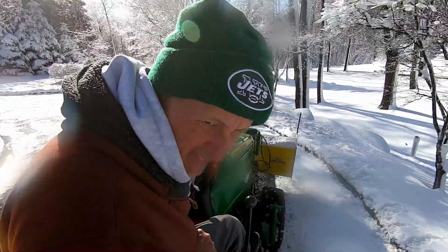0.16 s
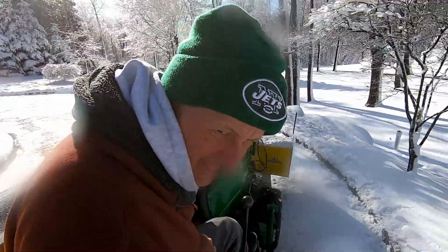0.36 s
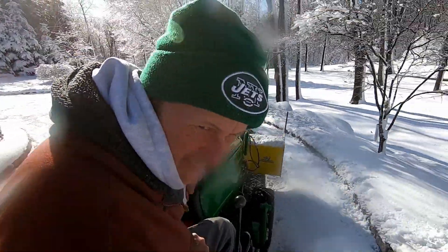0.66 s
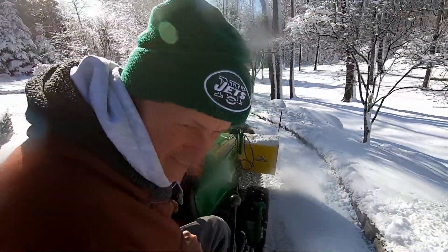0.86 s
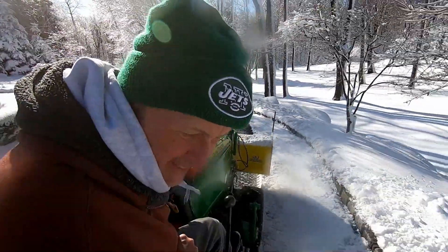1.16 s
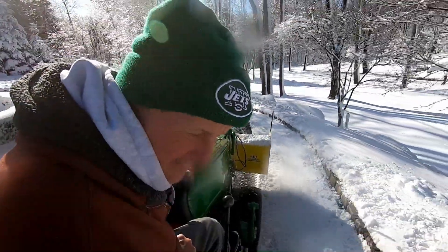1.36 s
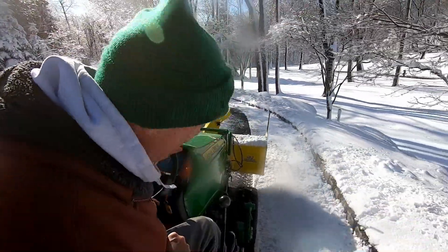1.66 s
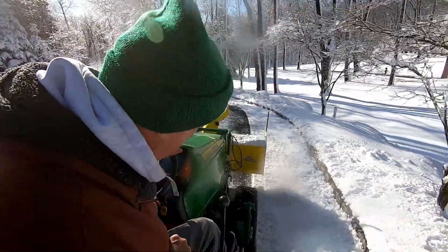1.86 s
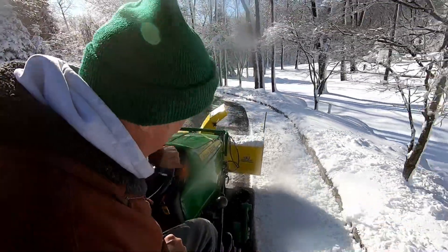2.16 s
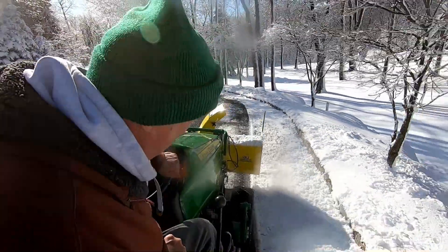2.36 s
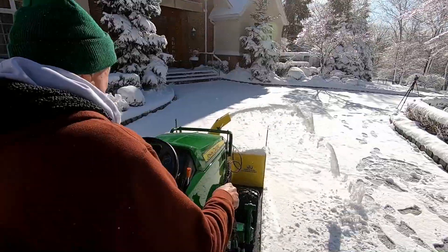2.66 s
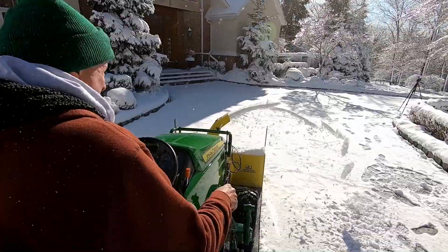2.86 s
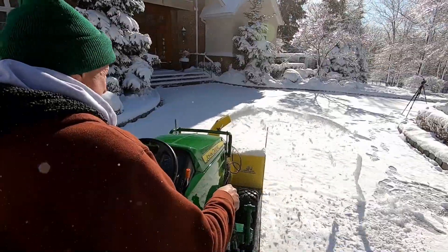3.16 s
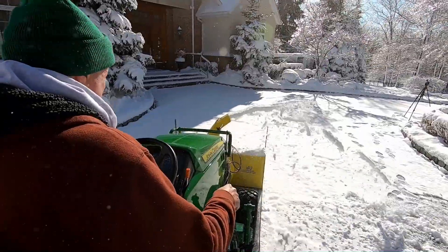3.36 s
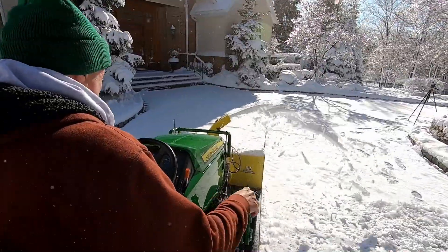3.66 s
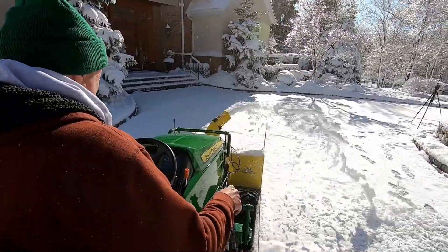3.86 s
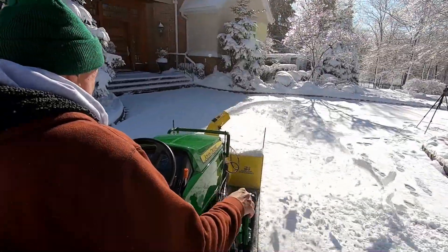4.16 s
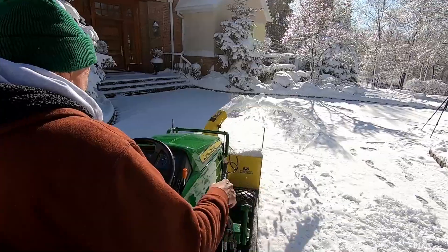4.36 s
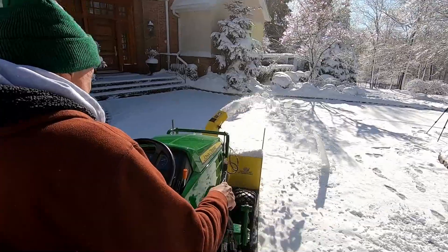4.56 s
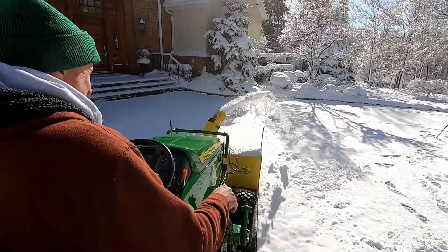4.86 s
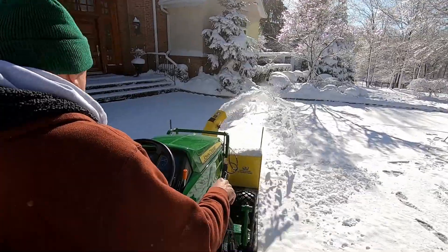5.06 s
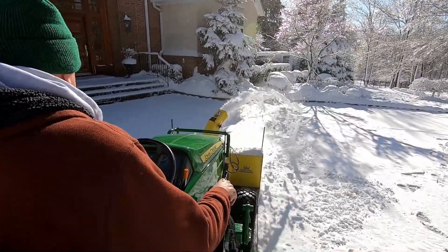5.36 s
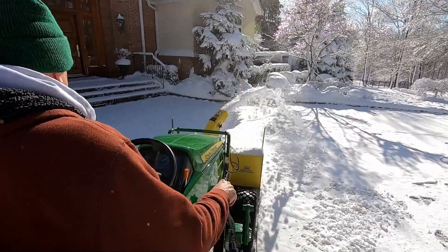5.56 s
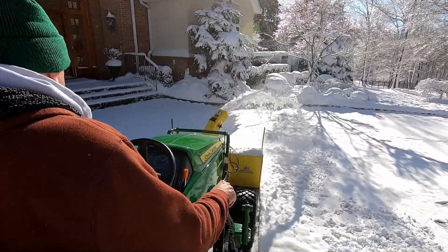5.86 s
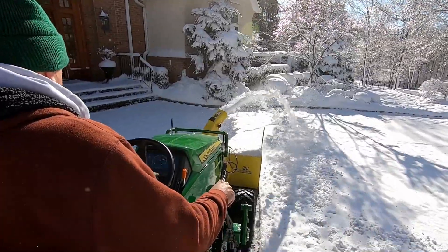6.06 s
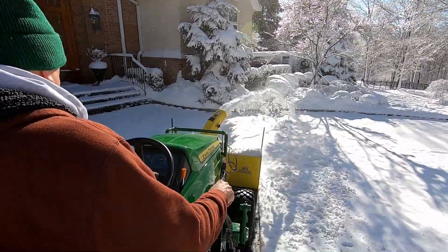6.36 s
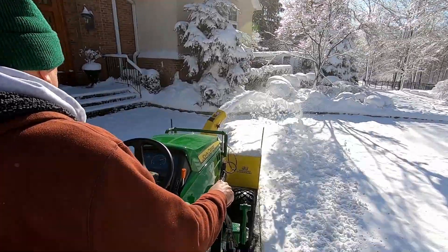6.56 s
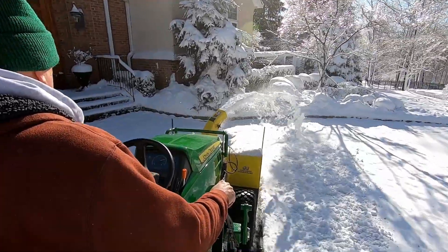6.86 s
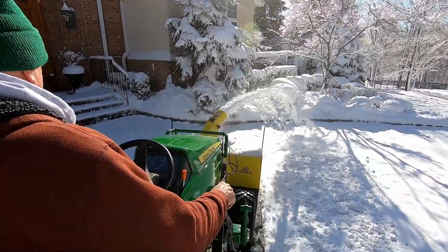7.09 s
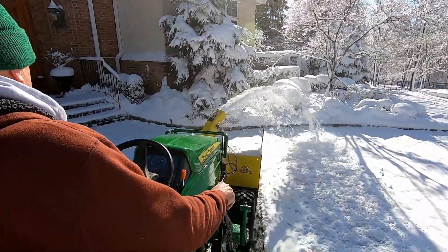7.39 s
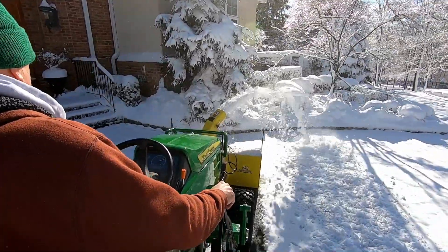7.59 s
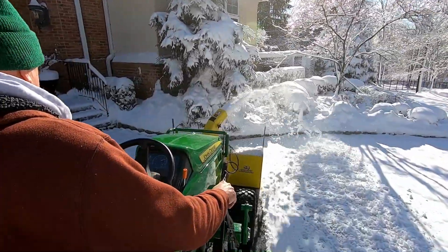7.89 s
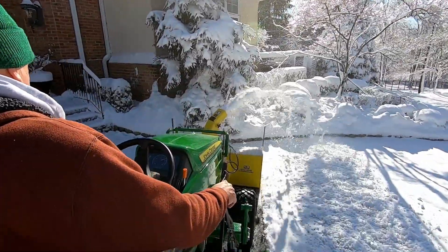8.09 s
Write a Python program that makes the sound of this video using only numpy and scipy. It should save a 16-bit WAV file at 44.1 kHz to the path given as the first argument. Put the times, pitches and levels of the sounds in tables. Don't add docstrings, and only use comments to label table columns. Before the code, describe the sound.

Steady low diesel drone with hydraulic whine and gear ring, breeze buffeting, then a sudden cut to a heavier metallic snow-blowing roar.

```python
import sys
import numpy as np
from scipy import signal
from scipy.fft import rfft, irfft, next_fast_len
from scipy.io import wavfile
from scipy.ndimage import uniform_filter1d, map_coordinates

SR = 44100
rng = np.random.default_rng(int(sys.argv[2]) if len(sys.argv) > 2 else 0)


def natural_amplitude(level_db):
    exponent = np.asarray(level_db, float) / 20
    return 10 ** exponent


def to_wav(s):
    ch = np.atleast_2d(s).T
    pcm = np.round(np.clip(ch, -1, 1) * 32767)
    wavfile.write(sys.argv[1], SR, pcm.astype(np.int16))


N = 362938
TIME = np.arange(N) / SR
CHANGE_S = 2.475

# (time [s], pump pressure [dB], gear load [dB], snow intake [dB])
EFFORT = [(0, 0, -20.5, -2.5), (.5, -9, -3, -1), (.8, -6, 6, 0.5), (1.6, -2.5, 4.5, 0.5), (2.45, 0, -1, 1),
          (2.5, 1, 3, -1.5), (3.7, 2.5, -12.5, 2), (4.5, 1.5, 5, 1), (5.1, 1.5, -2, 0.5), (5.7, 1, 5, 0.5),
          (6.9, 0.5, 4.5, -1.5), (7.2, -14.5, 4, -2), (8.23, -15, 4, -2.5)]
# (time [s], engine sag [cycles/s], moan level [dB])
BITE = [
    (3.3, 0, -34),
    (3.92, .55, -31),
    (4.42, .38, -44),
    (6, 0, -45),
]


def unit(x):
    return x / np.sqrt(np.mean(x ** 2) + 1e-20)


def along(points, hz):
    f, v = np.transpose(points)
    return np.interp(np.log(hz + 1), np.log(f + 1), v)


def curves(rows):
    s, *columns = np.transpose(rows)
    return [np.interp(TIME, s, column) for column in columns]


def wobble(rate):
    knots = rng.standard_normal(int(N * rate / SR) + 4)
    return map_coordinates(knots, [np.arange(N) * rate / SR])


def filtered(x, response):
    m = next_fast_len(N + 8192)
    return irfft(rfft(x, m) * response(np.fft.rfftfreq(m, 1 / SR)), m)[..., :N]


def by_stretch(first, second):
    share = np.clip((TIME - CHANGE_S) / .01 + .5, 0, 1)
    return first + share * (second - first)


def tone(turns, level_db, flutter_db, slip, phase=None):
    size = natural_amplitude(level_db + flutter_db * wobble(12))
    phase = rng.uniform(0, 2 * np.pi) if phase is None else phase
    return np.sqrt(2) * size * np.cos(2 * np.pi * turns + slip * wobble(9) + phase)


def band(x, lo_hz, hi_hz):
    def response(f):
        return 1 / np.sqrt((1 + (lo_hz / (f + 1)) ** 12) * (1 + (f / hi_hz) ** 12))

    y = filtered(x, response)
    edge = int(CHANGE_S * SR)
    return np.concatenate([unit(y[:edge]), unit(y[edge:])])


def speed():
    # (time [s], engine cycles [1/s])
    pace = [(0, 23.24), (1.5, 23.29), (2.1, 23.25), (4.6, 23.26), (5.8, 23.17), (6.3, 23.26), (6.8, 23.2),
            (7.75, 23.48), (8, 23.33), (8.23, 23.4)]
    sag_s, recover_s = .17, .13
    sag = sum(depth * np.interp(TIME, [s - sag_s, s, s + recover_s], [0, 1, 0]) for s, depth, _ in BITE)
    return curves(pace)[0] - sag


def engine(cycles):
    # (first stretch [dB], second stretch [dB])
    exhaust = [(-20, -17), (-36, -26.5)]
    # (first stretch [dB], second stretch [dB])
    upper_firing = [(-38.5, -32), (-38.5, -39), (-29, -38)]
    firing_phase = [2.4, -.9, 1.2, -.6]
    crank_orders = [2, 4, 8, 10, 32, 33, 72]
    # (first stretch [dB], second stretch [dB])
    crank = [(-42, -42.5), (-38.5, -33.5), (-45, -37.5), (-46.5, -52.5), (-46, -47.5), (-44, -43),
             (-40, -58)]
    _, load_db, snow_db = curves(EFFORT)

    firing_db = by_stretch(*exhaust[0]) + .25 * snow_db + .5 * wobble(3)
    levels_db = [by_stretch(*exhaust[1]) + 1.1 * wobble(8)]
    levels_db += [by_stretch(*db) for db in upper_firing]
    levels_db[3] = levels_db[3] + by_stretch(.45, 0) * (load_db - 2)
    boom = tone(3 * cycles, firing_db - .1, flutter_db=.3, slip=.04, phase=0)
    for harmonic, (db, phase) in enumerate(zip(levels_db, firing_phase), start=2):
        boom += tone(3 * harmonic * cycles, db, flutter_db=1.3, slip=.2, phase=phase)

    moan_db = np.max([db - 40 * np.abs(TIME - s) for s, _, db in BITE], axis=0)
    boom += tone(23.7 * cycles, moan_db, flutter_db=2.5, slip=.3)
    for order, db in zip(crank_orders, crank):
        boom += tone(order * cycles, by_stretch(*db), flutter_db=3.0, slip=0.28)
    return boom


def pump(cycles):
    orders = [14, 28, 42, 56]
    # (first stretch [dB], second stretch [dB])
    levels = [(-32, -36.5), (-40, -32), (-37.5, -47.5), (-21.7, -30.5)]
    pressure_db = curves(EFFORT)[0]
    felt = [.5, 1, .5, 0]
    flutter_db, slip = by_stretch(.7, 1.4), by_stretch(.15, .45)
    return sum(tone(order * cycles, by_stretch(*db) + share * pressure_db, flutter_db, slip)
               for order, db, share in zip(orders, levels, felt))


def gears(cycles):
    orders = [15.29, 30.58, 51.3, 53.95]
    # (first stretch [dB], second stretch [dB])
    levels = [(-32.5, -39.5), (-38, -39), (-46, -41.5), (-44, -33.5)]
    shrill_orders = [120, 168, 170.4]
    # (first stretch [dB], second stretch [dB])
    shrill = [(-44, -58.5), (-44.5, -53.5), (-50, -49)]
    load_db = curves(EFFORT)[1]
    felt = [0.95, 0.32, .5, 0.99]
    flutter_db, slip = by_stretch(1.3, 1.7), by_stretch(.3, .5)
    mesh = sum(tone(order * cycles, by_stretch(*db) + share * load_db, flutter_db, slip)
               for order, db, share in zip(orders, levels, felt))
    return mesh + sum(tone(order * cycles, by_stretch(*db), flutter_db=2.5, slip=1.6)
                      for order, db in zip(shrill_orders, shrill))


def wheel_creep():
    # (harmonic [1], level [dB])
    harmonics = [(2, -40), (4, -46), (5, -44), (6, -37)]
    turns = 301.1 * np.cumsum(1 + .002 * wobble(3)) / SR
    return sum(tone(k * turns, db, flutter_db=2.5, slip=.5) for k, db in harmonics)


def wheel_glide(cycles):
    # (time [s], multiple of the engine cycle [1], level [dB])
    travel = [(2.475, 58.55, -37), (3, 58.9, -37), (4.9, 59.1, -37), (6.1, 58.9, -35), (6.5, 58.3, -33),
              (7.15, 56.5, -30), (7.4, 55.8, -50), (8.23, 55.6, -60)]
    ratio, wheel_db = curves(travel)
    turns = np.cumsum(ratio * np.gradient(cycles))
    main = tone(turns, wheel_db, flutter_db=1.5, slip=.4)
    return main + tone(turns * 3 / 8, wheel_db - 8, flutter_db=2.5, slip=.3)


def smear(lines):
    def response(f):
        return np.sqrt(sum(natural_amplitude(2 * db) * SR / (np.pi * width) / (1 + (2 * (f - center) / width) ** 2)
                           for center, width, db in lines))

    return filtered(rng.standard_normal(N), response)


def drive(cycles):
    # (center [Hz], width [Hz], level [dB])
    loose_first = [(27, 2, -37), (1115, 6, -50), (2110, 15, -52), (2480, 60, -48), (6140, 40, -62)]
    # (center [Hz], width [Hz], level [dB])
    loose_second = [(47, 4, -38), (88, 4, -38), (1437, 8, -46), (2240, 30, -52), (4030, 20, -58)]
    first = smear(loose_first) + wheel_creep()
    second = smear(loose_second) + wheel_glide(cycles)
    return pump(cycles) + gears(cycles) + by_stretch(first, second)


def resonate(shake, roar, panels):
    def response(f):
        modes = sum(natural_amplitude(2 * db) / (1 + (2 * (f - center) / width) ** 6) for center, width, db in panels)
        return natural_amplitude(along(roar, f)) * np.sqrt(1 + modes)

    return filtered(shake, response)


def housing(cycles):
    # (frequency [Hz], density [dB per Hz])
    roar_first = [(20, -2), (60, -6.5), (150, 2.5), (300, -2.5), (460, -8.5), (900, -24.5), (2300, -24),
                  (4200, -27), (4700, -33), (7000, -32.5), (8500, -35.5), (10400, -41.5), (13000, -56.5)]
    # (frequency [Hz], density [dB per Hz])
    roar_second = [(20, -12), (60, 3), (100, 2), (220, -2.5), (450, -15), (850, -13.5), (1480, -11),
                   (1700, -19), (4200, -25), (4700, -32.5), (7000, -32), (8500, -40), (10000, -44),
                   (14000, -55)]
    # (center [Hz], width [Hz], lift [dB])
    panels_first = [(352, 71, 9), (714, 240, 6), (1327, 164, 10.5), (1863, 160, 8), (2843, 190, 5),
                    (3350, 220, 5.5), (3977, 120, 9.5), (6680, 180, 2.5)]
    # (center [Hz], width [Hz], lift [dB])
    panels_second = [(379, 89, 8), (629, 264, 12.5), (1284, 119, 12.5), (1863, 105, 11.5), (2078, 80, 5.5),
                     (2893, 120, 6), (3380, 130, 5.5), (3964, 60, 8.5)]
    # (first stretch [dB], second stretch [dB])
    load = [
        (-30.5, -25.5),
        (-31.5, -32),
        (-29, -34.5),
        (-30.5, -27.5),
        (-50, -49.5),
    ]
    feels_snow = [0.71, 0.97, -.5, -0.082, -.3]

    z = signal.stft(rng.standard_normal(N), nperseg=512)[2]
    patches = uniform_filter1d(rng.standard_normal(z.shape), 6, 0)
    patches = unit(uniform_filter1d(patches, 12, 1))
    shake = signal.istft(z * natural_amplitude(0.66 * patches), nperseg=512)[1][:N]
    shake *= 1 + 0.073 * np.cos(2 * np.pi * 3 * cycles)
    roar = by_stretch(resonate(shake, roar_first, panels_first), resonate(shake, roar_second, panels_second))

    snow_db = curves(EFFORT)[2]
    auger_db, drum_db, hood_db, panel_db, hiss_db = [
        by_stretch(*db) + share * snow_db + .8 * wobble(4) for db, share in zip(load, feels_snow)]
    out = natural_amplitude(auger_db) * band(roar, 88, 421)
    out += natural_amplitude(drum_db) * band(roar, 450, 1100)
    out += natural_amplitude(hood_db) * band(roar, 1100, 1420)
    out += natural_amplitude(panel_db) * band(roar, 1530, 4070)
    return out + natural_amplitude(hiss_db + 0.72 * wobble(12)) * band(roar, 4710, 14000)


def breeze():
    # (time [s], buffet level [dB])
    gusts = [(0, -28), (1.1, -27.5), (1.4, -32), (2.3, -35), (6, -35), (7.4, -31), (8.23, -28.5)]
    # (first stretch [dB], second stretch [dB])
    upper_db = (1.5, 4)
    (buffet_db,) = curves(gusts)
    lumps = natural_amplitude(1.2 * wobble(9)) * rng.standard_normal(N)
    low = natural_amplitude(buffet_db + 2.5 * wobble(3.2) - 1.5) * band(lumps, 22, 58)
    rumble_db = buffet_db + by_stretch(*upper_db) + 2.1 * wobble(4.5) - 6.5
    return low + natural_amplitude(rumble_db) * band(lumps, 58, 140)


def scene():
    # (frequency [Hz], left minus right [dB])
    balance = [(350, 0), (700, -.2), (1030, -1.2), (1300, -1), (1850, -1.4), (4000, -1.4), (5600, -1),
               (8200, -.1)]
    # (frequency [Hz], level [dB])
    apart = [(30, -31), (80, -38), (200, -50), (300, -47), (520, -32), (1030, -26), (1300, -28),
             (1850, -31), (2600, -23), (4000, -27), (4700, -16), (6000, -12), (8200, -8), (9500, -8)]
    cycles = np.cumsum(speed()) / SR
    machine = engine(cycles) + drive(cycles) + housing(cycles) + breeze()
    halves = np.array([[.5], [-.5]])
    pair = filtered(machine, lambda f: natural_amplitude(along(balance, f) * halves))
    scatter = signal.fftconvolve(machine, rng.standard_normal(8000) * np.hanning(8000) / 55)[:N]
    return pair + np.array([[1], [-1]]) * filtered(scatter, lambda f: natural_amplitude(along(apart, f)))


def ragged_treble(x, swing_db):
    # (frequency [Hz], step [dB])
    coarse = [(5000, -81), (7000, -78), (8500, -76.2), (9500, -76.5), (9600, -70), (10000, -70),
              (10100, -76), (11000, -76), (14000, -78)]
    block, lead, overlap = 1936, 2544, 484
    frame = dict(fs=SR, window=("tukey", .4), nperseg=block + overlap, noverlap=overlap)
    hz, t, z = signal.stft(np.pad(x, ((0, 0), (lead, lead)), "reflect"), **frame)

    def back(part):
        return signal.istft(part, **frame)[1][:, lead:lead + N]

    per_band = np.repeat(rng.standard_normal((len(hz) // 20 + 1, len(t))), 20, axis=0)[:len(hz)]
    swing = 1.3 * rng.standard_normal(len(t)) + .6 * per_band
    step = natural_amplitude(along(coarse, hz)[:, None] + swing_db * swing)
    rounded = np.floor(np.abs(z) / step + .4) * step * np.exp(1j * np.angle(z))
    rough = np.where(hz[:, None] > 5000, rounded, z)
    depth = np.clip(by_stretch(.2, .55) + .3 * wobble(20), 0, .95)
    seams = 1 - depth * np.cos(np.pi * ((np.arange(N) + lead) / block + .5)) ** 14
    top = np.clip((hz[:, None] - 5000) / 3500, 0, 1)
    return back(rough * (1 - top)) + seams * back(rough * top)


def low_pass(x):
    return signal.sosfilt(signal.butter(12, 13500, fs=SR, output="sos"), x)


def record(dry):
    def power(span_s):
        return np.abs(uniform_filter1d(np.mean(dry ** 2, axis=0), round(span_s * SR))) + 1e-6

    dry = dry * (power(.5) / power(.03)) ** .15
    dry = dry / (1 + np.abs(dry / .8) ** 6) ** (1 / 6)
    to_end = np.minimum(np.arange(N), np.arange(N)[::-1])
    dry = dry * np.clip(to_end / 40, 0, 1)
    mid, side = (dry[0] + dry[1]) / 2, (dry[0] - dry[1]) / 2
    mid, side = ragged_treble(np.array([mid, side]), swing_db=1.9)
    mix = np.array([mid + side, mid - side]) + .0015
    return low_pass(mix)


dry = scene()
out = record(dry)
to_wav(out)
```